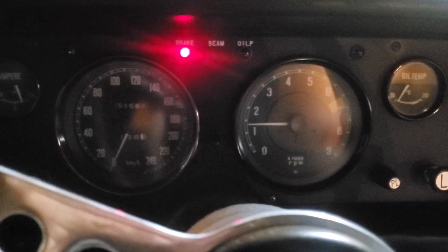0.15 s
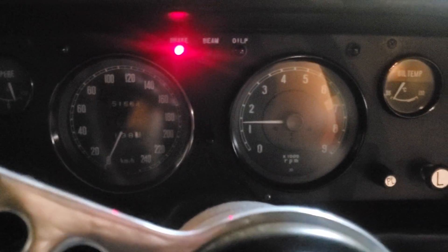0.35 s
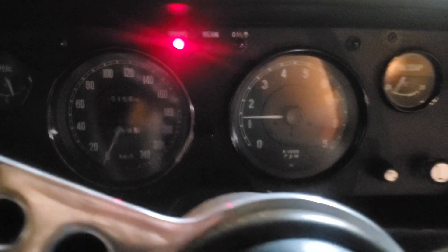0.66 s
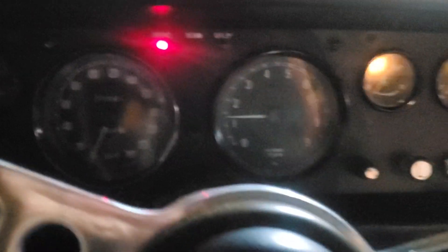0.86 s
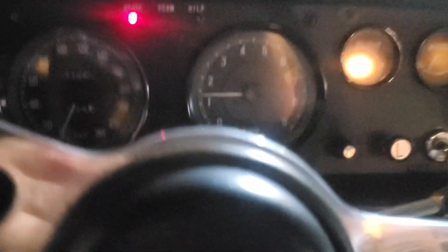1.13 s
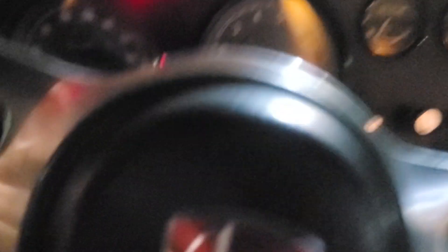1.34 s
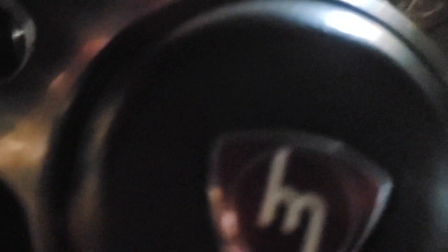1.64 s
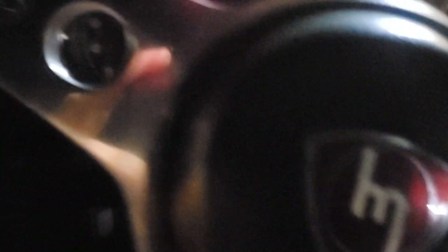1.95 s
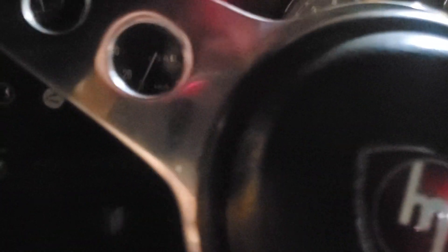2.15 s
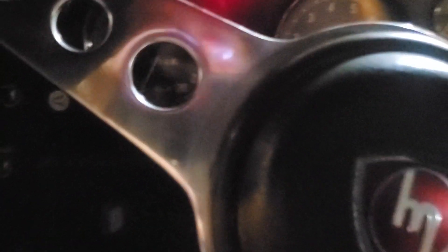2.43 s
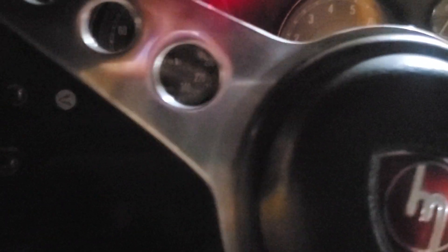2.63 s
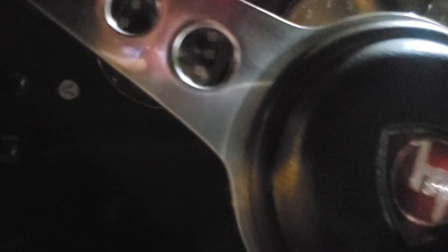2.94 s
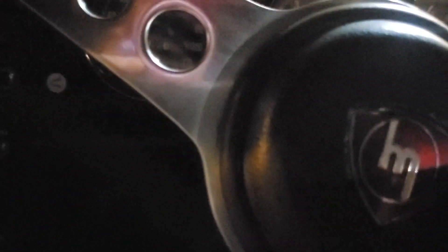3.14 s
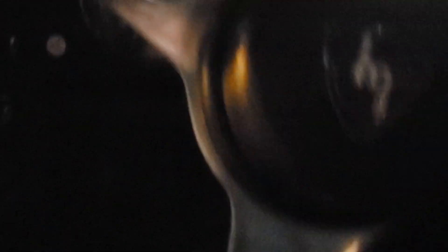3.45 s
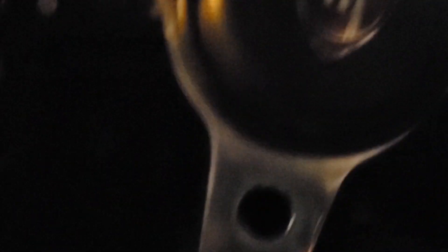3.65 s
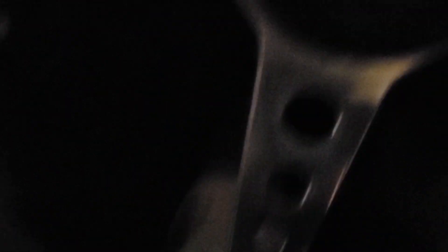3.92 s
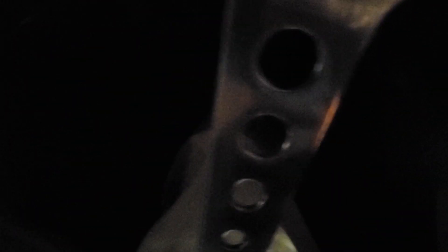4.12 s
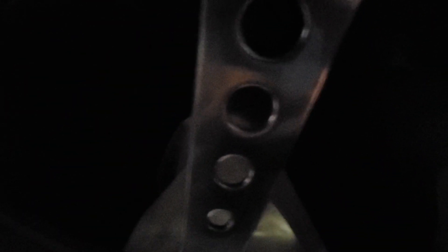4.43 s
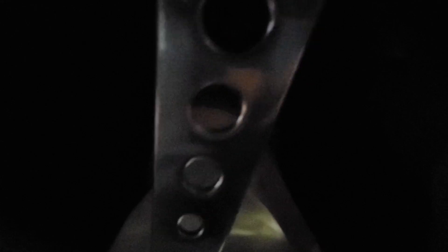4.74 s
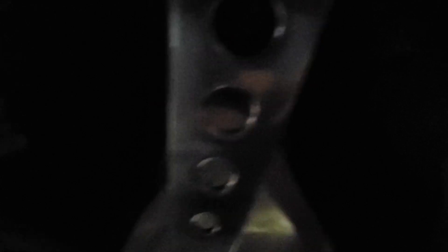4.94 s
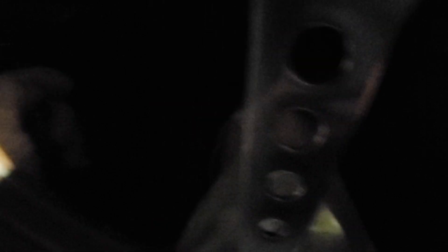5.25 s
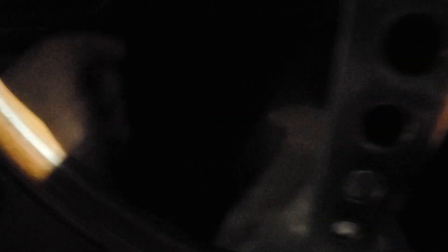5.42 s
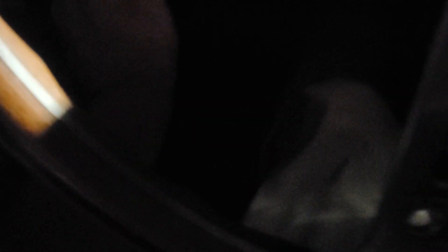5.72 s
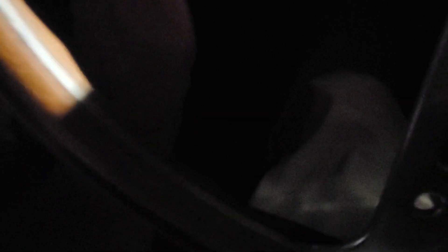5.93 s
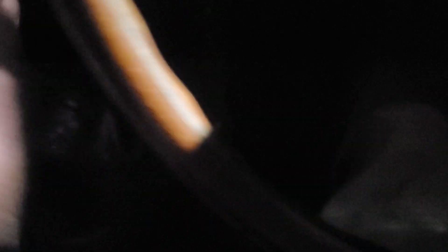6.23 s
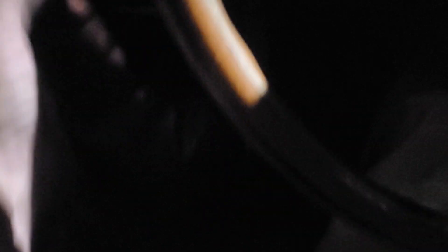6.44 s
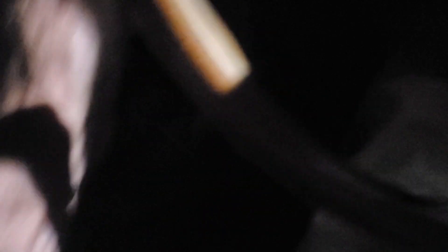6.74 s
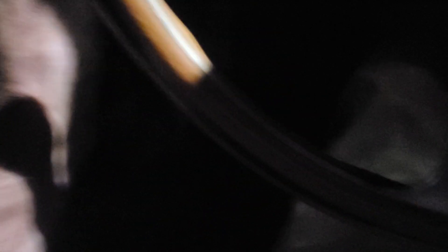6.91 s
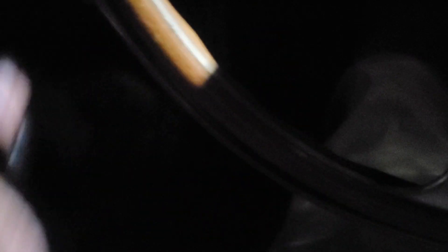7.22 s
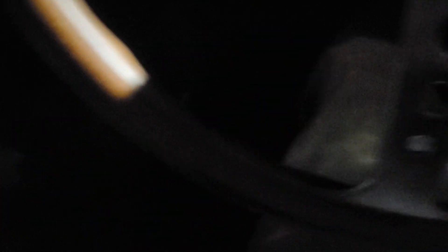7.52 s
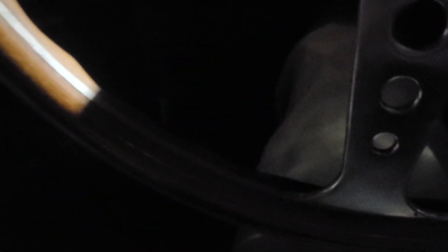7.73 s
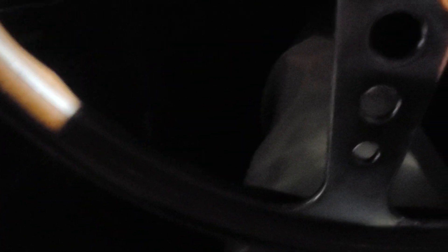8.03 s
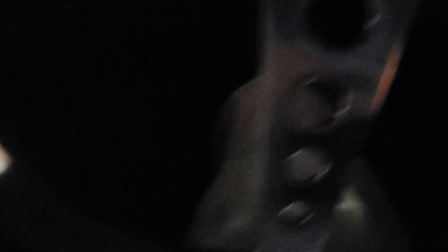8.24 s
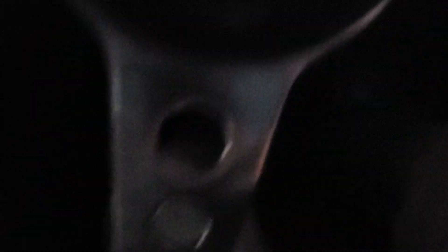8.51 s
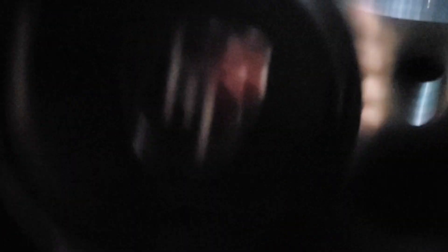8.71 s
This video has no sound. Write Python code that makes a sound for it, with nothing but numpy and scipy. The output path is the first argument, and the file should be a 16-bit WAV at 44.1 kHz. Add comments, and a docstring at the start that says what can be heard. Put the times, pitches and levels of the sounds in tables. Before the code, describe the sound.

A close cabin microphone catches a deep, fluttering engine drone with mechanical wash, faint ticking and quick spurts of hiss. Around three seconds a sharp double crack with a dull dashboard thump makes the recording level drop for about a second. The engine slows to an even, pulsing lumpy idle. Metallic clicks and tiny chirps come from hand controls, then two gentle revs swell and growl at the end.

```python
"""A fast, stumbling idle with hiss in spurts comes first: a two-rotor engine, heard inside an old car.
Firing pulses make its beat and ring the cabin; shaped noise makes its air and mechanical wash.
A knob, made of noise bursts and dashboard tones, snaps home; the automatic gain ducks for about a second.
The engine settles to a slow lope, about four surges a second. Rattling, ringing clicks come from the
controls under a hand, and two small blips of the throttle end it."""
import sys
import numpy as np
from scipy import signal
from scipy.fft import rfft, irfft, next_fast_len
from scipy.io import wavfile
from scipy.ndimage import uniform_filter1d, minimum_filter1d

SR = 44100
rng = np.random.default_rng(int(sys.argv[2]) if len(sys.argv) > 2 else 0)


def digitize_waveform(pressure):
    """Quantize a signal to 16-bit integers and store it at the path in sys.argv[1].

    Rows of a 2-D input are taken as channels; values are limited to [-1, 1].
    """
    field = np.atleast_2d(pressure).T
    bounded = np.clip(field, -1, 1)
    quanta = np.round(bounded * 32767).astype(np.int16)
    wavfile.write(sys.argv[1], SR, quanta)


N = 391156
TIME = np.arange(N) / SR

# engine speed before the flywheel sways it: [t/s, firing rate/Hz]
SPEED = [(0, 54.5), (1.2, 53.6), (2.5, 54.3), (3.05, 53.3), (3.7, 50), (4.4, 42), (7.93, 44.5), (8.07, 53),
         (8.28, 55.5), (8.46, 68), (8.64, 62), (8.8, 46)]
# engine heard through the body, before blips and surges: [t/s, drone level/dB, wash level/dB]
BODY = [(0, -27, -42), (3.5, -29.5, -46), (4.25, -29.5, -42.5), (5.15, -34.5, -40), (6.6, -36.5, -41),
        (7.7, -34, -40), (8.87, -33, -37)]
# the engine stumbles, a run of air puffs and then a surge: [t/s, puff level/dB, surge level/dB]
STUMBLES = [(-0.025, -33.5, 3.5), (0.185, -30.5, 2.5), (0.457, -31.5, 1.5), (0.735, -29.5, 0.5),
            (1.01, -32.5, -1.5), (1.235, -30, 1), (1.515, -30, 2.5), (1.73, -30.5, 1), (2.008, -30.5, 0.5),
            (2.282, -34, 4.5), (2.39, -30, 2), (2.505, -32.5, 5.5), (2.71, -28.5, 2), (2.925, -34, 2.5),
            (3.15, -45, 1), (3.46, -44.5, -0.5), (3.555, -43, 0), (3.77, -37, 1.5), (3.885, -37.5, -2),
            (4.03, -43, 1.5), (4.15, -37.5, 3.5), (4.355, -36, 5), (4.605, -36, 5.5), (4.838, -36, 6.5),
            (5.075, -37.5, 6.5), (5.35, -39, 7), (5.63, -40.5, 6.5), (5.757, -40, 2), (5.87, -39, 5.5),
            (6.135, -37.5, 6.5), (6.394, -42.5, 7.5), (6.643, -38, 5), (6.835, -37.5, 6.5),
            (7.06, -37.5, 7), (7.335, -37.5, 6.5), (7.605, -37.5, 6), (7.868, -38, 9.5), (8.2, -35.5, 0.5),
            (8.72, -41, 0)]
# the puffs of every stumble, each with a sag of the exhaust beat:
# [fast idle: delay t/s, level/dB, sag level/dB; then the same three in the lope]
PUFFS = [(-0.028, -9, 1.3, -0.032, -22.5, 1.5), (0, -2, 2.5, -0.00067, -1, 11),
         (0.056, -3.5, 19, 0.0545, -3, 4.1), (0.135, -9.5, 2, 0.097, -3, 0.62),
         (0.193, -11, 1, 0.1636, -13, 6.6)]
# the quick stumbling gives way to a slow lope: [t/s, share of lope]
LOPE = [(4.2, 0), (4.55, 1)]
# outright misfires leave a hole in the beat: [t/s, depth level/dB]
MISFIRES = [(0.56, 9.5), (0.835, 4), (1.08, 8), (2.115, 7), (2.325, 3), (3.09, 11.5), (3.8, 10),
            (4.375, 12), (8.15, 7), (8.46, 12), (8.74, 8)]
# blips of the throttle: [t/s, length t/s, air rush level/dB, drone rise level/dB, growl level/dB]
BLIPS = [(7.864, 0.21, -35, 4, -26), (8.35, 0.14, -33, 4.5, -22)]
# cabin and pipe resonances: [f/Hz, width f/Hz, fast idle level/dB, slow idle level/dB]
CABIN = [(60.4, 12, 0.5, 3.5), (108, 5.9, 4.5, -6.5), (136.8, 16.3, -12, 0), (182.4, 18.2, -1.5, -4.5),
         (234.5, 8.8, -2, -13.5)]
# tones locked to the shaft: [multiple of the firing rate]
ORDER_MULTIPLES = [2.75, 3]
# their levels against the drone: [fast idle level/dB, slow idle level/dB]
ORDER_LEVELS = [(-8, -14), (-28, -5)]
# overtones of the firing rate under throttle, from the second up: [level/dB]
GROWL_LEVELS = [-4, 0, -11, -16]
# the snapping knob and its rebounds: [t/s, level/dB, decay t/s]
SNAP = [(3.1498, 2.5, 0.014), (3.166, 2.5, 0.004), (3.179, -9, 0.007), (3.297, -28, 0.015)]
# colour of the snap: [f/Hz, level/dB]
SNAP_COLOUR = [(150, 12), (380, -11), (490, 17.5), (650, -17), (1300, -11), (2900, 3.5), (5500, -1),
               (12500, -9), (16000, -7.5)]
# tones of the dashboard after a knock: [f/Hz, level/dB, time to fall 60 dB t/s]
DASH = [(50.16, 2, 0.75), (93, 4.5, 0.41), (134.3, -5.5, 0.53), (168.9, -4, 0.53), (194.3, -6, 0.23),
        (323, -18, 0.21)]
# clicks of the controls; ring is relative to the click, thud is not:
# [t/s, level/dB, left-right level/dB, rattle decay t/s, ring level/dB, thud level/dB]
CLICKS = [(3.845, -27, -13, 0.011, -4, -61), (4.0087, -24, -10, 0.0015, -22, -60),
          (4.04, -29, -16, 0.06, -32, -36), (4.0605, -11, -17, 0.00064, -10, -33),
          (4.08, -23, 4, 0.002, -20, -54), (5.235, -28.5, -3, 0.022, -21, -56),
          (5.3237, -28.5, -8, 0.025, 16.5, -58), (5.654, -28.5, -11, 0.01, -6, -53),
          (5.669, -20, 0, 0.014, 0, -31.5), (5.69, -24.5, -6, .012, -2, -24),
          (5.840, -23.5, -20, 0.0016, -18, -60), (6.769, -24.5, 0, 0.02, 0, -41),
          (7.345, -29.5, -4, 0.052, -11, -33), (8.663, -10.5, -20, 0.0011, -31, -34),
          (8.67, -24, -4, 0.00098, -14, -53)]
# colour of the rattles: [f/Hz, level/dB]
CLICK_COLOUR = [(200, 29), (700, 18.5), (1700, 18), (4500, 13), (8000, 8), (16000, -4)]
# tones of the clicking linkage: [f/Hz, level/dB, time to fall 60 dB t/s]
LINKAGE = [(1777, -4.5, 0.027), (2050, -22, 0.12), (2700, -21.5, 0.047), (3180, -11, 0.061),
           (4470, -14, 0.036), (5800, -24, 0.024)]
# brief chirps where parts of the controls rub: [t/s, level/dB, f/Hz, decay t/s]
CHIRPS = [(4.0822, -12.5, 3550, 0.0012), (5.655, -28, 3400, 0.01), (5.668, -16.5, 2960, 0.0048),
          (5.67, -12, 1650, 0.0023), (5.690, -25.5, 2930, 0.011), (6.77, -27, 2900, 0.006)]
# colour of the mechanical wash: [f/Hz, fast idle level/dB, slow idle level/dB]
WASH = [(240, -24.5, -7), (356, -8, -16), (445, -10, -10), (620, -18, -20), (1110, -16.5, -19),
        (2120, -25.5, -26.5), (3540, -22.5, -30.5), (6900, -59, -60)]
# panels singing along: [f/Hz, width f/Hz, fast idle level/dB, slow idle level/dB]
PANELS = [(146.7, 10.3, 0.5, 0.5), (199.6, 5.8, 0.5, -4), (237.9, 6.7, -17, -7), (327.4, 10.3, -2.5, -3.5),
          (686, 87, -5, -11), (971, 13, -19, -13.5), (1998, 14, -15.5, -16)]
# what the ticking part rings with: [f/Hz, width f/Hz, level/dB]
TICK_MODES = [(850, 150, -4), (1470, 140, -1), (1650, 140, 0), (1910, 140, 0)]
# colour of the rushing air: [f/Hz, fast idle level/dB, slow idle level/dB]
AIR = [(1530, -1, -5), (2680, -3.5, 4.5), (3580, 0.5, 0.5), (6860, 2.5, 4), (7550, 2.5, 1), (9280, -1.5, 7),
       (10030, 3.5, -1.5), (11100, -3.5, 1), (15800, -2.5, -3)]
# wheezes at fast idle: [t/s, length t/s, level/dB, start f/Hz, end f/Hz]
WHEEZES = [(.5, .44, -50, 1880, 1880), (2.0, .45, -49, 1950, 1640)]
# a thin whine that comes and goes: [t/s, level/dB]
WHINE = [(0, -58), (.3, -51), (.7, -59), (3.7, -63), (3.88, -52), (4.7, -51), (5.2, -63)]
# the two tones of the whine, before they waver: [f/Hz]
WHINE_TONES = [3063, 3145]
# left-right balance of the engine's noise: [f/Hz, fast idle level/dB, slow idle level/dB]
LEAN = [(600, 1, -1.5), (1500, -1, -6.5), (2740, -1, -8), (6660, 0, 3), (8250, -6, -7.5), (14000, 2, 5)]

# the surge peaks this long after a stumble
SURGE_FAST_S, SURGE_SLOW_S, SURGE_WIDTH_S = 0.165, 0.105, 0.08
# the beat sags this long after each puff, at fast idle and in the lope
SAG_FAST_S, SAG_SLOW_S, SAG_WIDTH_S = 0.035, 0.021, 0.012
MISFIRE_WIDTH_S = 0.025
# each puff swells, holds and dies; a little air leaks between the puffs
PUFF_ATTACK_S, PUFF_HOLD_S, PUFF_RELEASE_S, AIR_FLOOR_DB = 0.0048, 0.02, 0.032, -51
# exhaust beat between surges; it weakens once the firing rate climbs past the cabin's boom
BEAT_FAST_DB, BEAT_SLOW_DB, BOOM_TOP_HZ, OFF_BOOM_DB_PER_HZ = -16, -18, 58.4, 0.6
# the flywheel follows the surges with this lag; share of speed gained per dB of surge
FLYWHEEL_S, SPIN_FAST, SPIN_SLOW = 0.1, 0.01, 0.028
# the wash takes this share of the drone's rise in a blip
BLIP_ATTACK_S, BLIP_RELEASE_S, BLIP_WASH_SHARE = 0.038, 0.071, 0.55
CHATTER_DB, CHATTER_RATE_HZ = 3.5, 90
RATTLE_SWELL = 0.07  # share of a rattle's decay
CHIRP_WIDTH_HZ, CHIRP_ATTACK_S, CHIRP_PAN_DB = 600, 0.00034, -9
TICK_DB = -6.5  # against the wash
WHEEZE_WIDTH_HZ = 110
CUTOFF_HZ = 16000


def engine(drone_follows=0.051):
    """Exhaust, drone, machinery and air; surges spin the flywheel up and stumbles let it sag."""
    firing_hz, = in_time(SPEED)
    drone_db, wash_db = in_time(BODY)
    slow, = in_time([(3.6, 0), (4.5, 1)])  # 0 at fast idle, 1 at slow idle
    puffs, surge_db = stumbling()
    rush, blip_db, growl_gain = throttle()

    beat_db = between(BEAT_FAST_DB, BEAT_SLOW_DB, slow) + surge_db - bumps(MISFIRES, MISFIRE_WIDTH_S)
    swing_db = beat_db - uniform_filter1d(beat_db, SR // 2)
    surge_swing_db = surge_db - uniform_filter1d(surge_db, SR // 2)
    keep = np.exp(-1 / (FLYWHEEL_S * SR))
    spin_db = signal.lfilter([1 - keep], [1, -keep], surge_swing_db)
    swayed_hz = firing_hz * (1 + between(SPIN_FAST, SPIN_SLOW, slow) * spin_db)
    firings = np.cumsum(swayed_hz) / SR  # running count of firings

    off_boom_db = OFF_BOOM_DB_PER_HZ * np.maximum(firing_hz - BOOM_TOP_HZ, 0)
    beat = from_db(beat_db - off_boom_db) * exhaust(firings, slow)
    body = from_db(drone_db + blip_db + drone_follows * swing_db) * drone(firings, slow)
    tones = from_db(drone_db) * orders(firings, slow) + growl_gain * growl(firings)
    machinery = from_db(wash_db + BLIP_WASH_SHARE * blip_db) * wash(firings, slow)
    ticks = from_db(wash_db + TICK_DB) * (1 - slow) * ticking(firings)
    air_gain = np.sqrt(puffs ** 2 + rush ** 2 + from_db(AIR_FLOOR_DB) ** 2)
    air = air_gain * hiss(firings, slow)
    return beat + body + tones + lean(machinery + ticks + wheezes() + accessories(slow) + air, slow)


def exhaust(firings, slow, boom_fast_db=-13, boom_slow_db=-23, wander_turns=0.37):
    """One pressure wave per firing; a cabin boom at 3/4 of that rate weakens about every fourth."""
    second_gain = from_db(-18) * (1 - 0.87 * slow)
    second = second_gain * np.sin(2 * np.pi * 2 * firings)
    uneven = 0.21 * (1 - 0.19 * slow) * drift(18.6)
    beat = (np.sin(2 * np.pi * firings) + second) * (1 + uneven)
    boom_turns = firings * 3 / 4 + wander_turns * drift(1.02)
    boom = from_db(between(boom_fast_db, boom_slow_db, slow)) * np.sin(2 * np.pi * boom_turns)
    side = from_db(-21) * beat * [[1], [-1]] * (1 - slow)
    return np.sqrt(2) * (beat + side + boom)


def drone(firings, slow, uneven_db=6.0, jitter_s=0.0004, rough_db=-13, side_db=-12, path_s=0.007):
    """Uneven firing pulses and turbulence reach each next resonance by a longer path."""
    at = np.flatnonzero(np.diff(np.floor(firings)))
    late, strength = rng.standard_normal((N // 100, 2))[:len(at)].T
    places = np.clip(at + (jitter_s * SR * late).astype(int), 0, N - 1)
    pulses = np.zeros(N)
    pulses[places] = from_db(uneven_db * np.tanh(strength))
    turbulence = from_db(rough_db) * rng.standard_normal(N)
    side = from_db(side_db) * rng.standard_normal(N) * [[1], [-1]]
    drive = rms_one(pulses) + turbulence + side
    rung = 0
    for k, (hz, width, fast_db, slow_db) in enumerate(CABIN):
        delayed = np.roll(drive, int(k * path_s * SR), axis=1)
        rung = rung + from_db(between(fast_db, slow_db, slow)) * resonate(delayed, hz, width)
    return rms_one(signal.sosfilt(signal.butter(2, [60, 320], "band", fs=SR, output="sos"), rung))


def orders(firings, slow, waver_db=7.5, wander_turns=0.064):
    """Clean tones locked to the shaft, each wavering in level and phase."""
    out = 0
    for multiple, (fast_db, slow_db) in zip(ORDER_MULTIPLES, ORDER_LEVELS):
        level_db = between(fast_db, slow_db, slow) + waver_db * np.tanh(drift(2.8))
        turns = multiple * firings + wander_turns * drift(18.0)
        out = out + from_db(level_db) * np.sin(2 * np.pi * turns)
    return out


def growl(firings):
    """Under throttle a growl of overtones, each wavering in level, stands out and follows the firing rate."""
    out = 0
    for k, db in enumerate(GROWL_LEVELS, 2):
        out = out + from_db(db + 2.5 * drift(14)) * np.sin(2 * np.pi * k * firings)
    return rms_one(out)


def throttle():
    """Each blip opens, holds and shuts: gain of its air, dB added to the drone, gain of its growl."""
    rush, rise_db, growl_gain = 0, 0, 0
    for s, length, air_db, drone_db, growl_db in BLIPS:
        rise = 1 - np.exp(-np.maximum(TIME - s, 0) / BLIP_ATTACK_S)
        fall = np.exp(-np.maximum(TIME - s - length, 0) / BLIP_RELEASE_S)
        opening = rise * fall
        rush = rush + from_db(air_db) * opening
        rise_db = rise_db + drone_db * opening
        growl_gain = growl_gain + from_db(growl_db) * opening ** 2
    return rush, rise_db, growl_gain


def stumbling():
    """Gain of the air puffs, and dB of the beat's surges and sags; a new stumble cuts off the last."""
    power, sags, surges = np.zeros(N), [], []
    lopes = np.interp([s for s, _, _ in STUMBLES], *np.transpose(LOPE))
    ends = [s + PUFFS[0][0] for s, _, _ in STUMBLES[1:]] + [N / SR]
    for (start, puff_db, surge_db), lope, end in zip(STUMBLES, lopes, ends):
        surges.append((start + between(SURGE_FAST_S, SURGE_SLOW_S, lope), surge_db))
        for fast_puff, slow_puff in np.reshape(PUFFS, (-1, 2, 3)):
            delay, db, sag_db = between(fast_puff, slow_puff, lope)
            s = start + delay
            if s >= end:
                continue
            span, _ = after(max(s - PUFF_ATTACK_S, 0))
            since = TIME[span] - s - PUFF_ATTACK_S
            swell = (np.minimum(since, 0) / PUFF_ATTACK_S) ** 2
            fade = (np.maximum(since - PUFF_HOLD_S, 0) / PUFF_RELEASE_S) ** 2
            power[span] += (from_db(puff_db + db) * np.exp(-swell - fade)) ** 2
            sags.append((s + between(SAG_FAST_S, SAG_SLOW_S, lope), sag_db))
    return np.sqrt(power), bumps(surges, SURGE_WIDTH_S) - bumps(sags, SAG_WIDTH_S)


def knob(boom_db=0.0, boom_delay=0.0195, tail_db=-7, tail_decay=0.063, pan_db=-3.0):
    """A hard snap with its rebounds; the dashboard booms and its loose parts chatter briefly."""
    out, crack = np.zeros((2, N)), noise(SNAP_COLOUR)
    for s, db, decay in SNAP:
        span, age = after(s)
        out[:, span] += from_db(db) * spread(pan_db) * crack[:, span] * np.exp(-age / decay)
    span, age = after(SNAP[0][0])
    parts = noise([(110, 17), (230, 15.5), (500, 11.0), (3000, -5.5), (16000, -22)])
    chatter = rms_one(from_db(CHATTER_DB * np.tanh(drift(CHATTER_RATE_HZ)))) * parts
    out[:, span] += from_db(tail_db) * chatter[:, span] * np.exp(-age / tail_decay)
    span, age = after(SNAP[0][0] + boom_delay)
    out[:, span] += from_db(boom_db) * struck(DASH, age) * (1 - np.exp(-age / 0.0079))
    return out


def controls():
    """Each click is a short rattle, a ring of the linkage and a thud in the dashboard."""
    out, rattle = np.zeros((2, N)), noise(CLICK_COLOUR)
    for s, db, pan_db, decay, ring_db, thud_db in CLICKS:
        span, age = after(s)
        shape = (1 - np.exp(-age / (RATTLE_SWELL * decay))) * np.exp(-age / decay)
        click = rattle[:, span] * shape + from_db(ring_db) * struck(LINKAGE, age)
        out[:, span] += from_db(db) * spread(pan_db) * click + from_db(thud_db) * struck(DASH, age)
    return out


def chirps():
    """A moment of friction excites one resonance of the rubbing part."""
    out = np.zeros((2, N))
    for s, db, hz, decay in CHIRPS:
        span, age = after(s)
        once = resonate(rng.standard_normal((2, SR)), hz, CHIRP_WIDTH_HZ)
        rub = rms_one(resonate(once, hz, CHIRP_WIDTH_HZ))[:, :len(age)]
        shape = (1 - np.exp(-age / CHIRP_ATTACK_S)) * np.exp(-age / decay)
        out[:, span] += from_db(db) * spread(CHIRP_PAN_DB) * rub * shape
    return out


def wash(firings, slow, throb_db=-1.5, panel_side=0.53):
    """Mechanical noise throbs once per firing, and a few panels sing along with it."""
    drive = rng.standard_normal(N) + panel_side * rng.standard_normal((2, N))
    song = 0
    for hz, width, fast_db, slow_db in PANELS:
        panel = rms_one(resonate(resonate(drive, hz, 2 * width), hz, 2 * width))
        song = song + from_db(between(fast_db, slow_db, slow)) * panel
    return idle_noise(WASH, slow) * from_db(throb_db * np.sin(2 * np.pi * firings)) + song


def ticking(firings, uneven_db=1.2):
    """Something on the engine ticks twice for every three firings and rings the same few modes."""
    at = np.flatnonzero(np.diff(np.floor(firings * 2 / 3)))
    chance = rng.standard_normal((N // 500, len(TICK_MODES), 2))[:len(at)]
    out = 0
    for k, (hz, width, db) in enumerate(TICK_MODES):
        strokes = np.zeros((2, N))
        right_sign = (-1) ** (k // 3)  # the fourth mode is opposite in the two channels
        strokes[:, at] = from_db(db + uneven_db * chance[:, k].T) * [[1], [right_sign]]
        out = out + resonate(strokes, hz, width)
    return rms_one(out)


def hiss(firings, slow, flutter_db=0.8, patchy_db=1.3):
    """Rushing air flutters with each turn of the shaft, which is two firings."""
    flutter = flutter_db * np.sin(np.pi * firings)
    return idle_noise(AIR, slow) * from_db(flutter + patchy_db * drift(29))


def wheezes():
    """A narrow band of noise swells and fades; its pitch may slide."""
    out = np.zeros((2, N))
    for s, length, db, from_hz, to_hz in WHEEZES:
        span, age = after(s)
        along = np.minimum(age / length, 1)
        phase = 2 * np.pi * np.cumsum(between(from_hz, to_hz, along)) / SR
        swell = np.sqrt(np.abs(np.sin(np.pi * along)))
        for side in out:
            cosine_part = drift(WHEEZE_WIDTH_HZ)[span] * np.cos(phase)
            sine_part = drift(WHEEZE_WIDTH_HZ)[span] * np.sin(phase)
            side[span] += from_db(db) * swell * (cosine_part + sine_part)
    return out


def accessories(slow, hum_hz=638, hum_db=-47, low_hz=203, low_db=19):
    """A wavering hum at fast idle, and a thin two-tone whine that comes and goes with a low hum."""
    whine_db, = in_time(WHINE)
    hum_gain = from_db(hum_db + 1.5 * drift(7)) * (1 - slow)
    hum = hum_gain * np.sin(2 * np.pi * np.cumsum(hum_hz + 8 * drift(14)) / SR)
    whine = 0
    for hz in WHINE_TONES:
        tone = np.sin(2 * np.pi * np.cumsum(hz + 16 * drift(19.3)) / SR)
        whine = whine + from_db(4.9 * np.tanh(drift(2.3))) * tone
    low = from_db(low_db) * np.sin(2 * np.pi * np.cumsum(low_hz + drift(1.48)) / SR)
    return hum + from_db(whine_db) * (rms_one(whine) + low)


def lean(x, slow):
    """Each band reaches the two microphone ports at different levels."""
    size = next_fast_len(N)
    hz, spectrum = np.fft.rfftfreq(size, 1 / SR), rfft(x, size)
    points, *columns = np.transpose(LEAN)
    leaned = []
    for db in columns:
        gain = from_db(np.interp(hz, points, db) * [[1], [-1]] / 2)
        gain = gain / np.sqrt(np.mean(gain ** 2, axis=0))
        leaned.append(irfft(spectrum * gain, size)[:, :N])
    return between(*leaned, slow)


def idle_noise(colours, slow):
    """Noise whose colour passes from that of the fast idle to that of the slow one."""
    fast_noise = noise([(hz, db) for hz, db, _ in colours])
    slow_noise = noise([(hz, db) for hz, _, db in colours])
    return np.sqrt(1 - slow) * fast_noise + np.sqrt(slow) * slow_noise


def noise(spectrum, merge_hz=650, ripple_hz=45):
    """Coloured stereo noise, alike in both ears below merge_hz; cabin reflections ripple its spectrum."""
    size = next_fast_len(N)
    hz = np.maximum(np.fft.rfftfreq(size, 1 / SR), 1)
    points = np.array(spectrum)
    colour_db = np.interp(np.log(hz), np.log(points[:, 0]), points[:, 1])
    low_fade = np.minimum(hz / points[0, 0], 1) ** 2
    chance_db = 2.2 * rng.standard_normal(SR // 20)
    ripple_db = np.interp(hz / ripple_hz, np.arange(len(chance_db)), chance_db) * hz / (hz + merge_hz)
    gain = from_db(colour_db + ripple_db) * low_fade
    alike = 1 / (1 + (hz / merge_hz) ** 4)
    mid, side = rfft(rng.standard_normal((2, size)))
    stereo = np.sqrt(1 + alike) * mid + np.sqrt(1 - alike) * side * [[1], [-1]]
    return rms_one(irfft(gain * stereo, size)[:, :N])


def resonate(x, hz, width):
    """A resonance with gain 1 on top."""
    r = np.exp(-np.pi * width / SR)
    feedback = [1, -2 * r * np.cos(2 * np.pi * hz / SR), r * r]
    return signal.lfilter(np.array([1, 0, -1]) * (1 - r * r) / 2, feedback, x + 1e-18)


def struck(modes, age):
    """Decaying tones of a struck body at a given time since the blow, with alternating signs."""
    out = 0
    for k, (hz, db, t60) in enumerate(modes):
        out = out + (-1) ** k * from_db(db - 60 * age / t60) * np.sin(2 * np.pi * hz * age)
    return out


def drift(rate_hz):
    """Slow chance with spread 1, made at every 40th sample and joined by lines."""
    r = np.exp(-80 * np.pi * rate_hz / SR)
    chance = rng.standard_normal(N // 40 + 2002)
    slow = signal.lfilter([1], [1, -2 * r, r * r], chance)[2000:]  # drop the run-in
    return np.interp(np.arange(N) / 40, np.arange(len(slow)), rms_one(slow))


def bumps(rows, width_s):
    """A bell-shaped bump for each row of (t/s, height)."""
    coarse = TIME[::40]
    total = sum(height * np.exp(-((coarse - s) / width_s) ** 2) for s, height in rows)
    return np.interp(TIME, coarse, total)


def between(start, end, share):
    """A value passing from start (such as fast idle) to end (slow idle)."""
    return start + share * (end - start)


def in_time(rows):
    """Each column of a curve at every sample."""
    s, *columns = np.transpose(rows)
    return [np.interp(TIME, s, c) for c in columns]


def after(s):
    """Up to a second following an event: its samples and their ages."""
    start = round(s * SR)
    stop = min(start + SR, N)
    return slice(start, stop), np.arange(stop - start) / SR


def spread(db):
    """Left and right gains of equal total power for a level difference."""
    return rms_one(from_db(np.array([[db], [-db]]) / 2))


def from_db(db):
    """Decibels to gain."""
    return 10 ** (np.asarray(db) / 20)


def rms_one(x):
    """Scale to unit power."""
    return x / np.sqrt(np.mean(x ** 2) + 1e-20)


def scene():
    """Engine, knob and controls, heard from the driver's seat."""
    return engine() + knob() + controls() + chirps()


def gain_control(x, threshold_db=-21, deepest_db=12.0, hold_s=1.197, release_db_per_s=31):
    """A loud sound above the bass pulls the gain down at once; it is held, then comes back."""
    sensed = signal.sosfilt(signal.butter(2, 400, "high", fs=SR, output="sos"), x)
    power = uniform_filter1d(np.mean(sensed ** 2, axis=0), SR // 100, origin=SR // 250)
    over_db = np.clip(10 * np.log10(np.maximum(power, 1e-12)) - threshold_db, 0, deepest_db)
    size = int(hold_s * SR) // 2 * 2 + 1
    held_db = -minimum_filter1d(-over_db, size, origin=size // 2, mode="constant")
    release_db = release_db_per_s * TIME
    cut_db = np.maximum.accumulate(held_db + release_db) - release_db
    return x * from_db(-cut_db)


def record(dry):
    """Low cut of the microphone, gain control, rounded peaks and a steep top cut."""
    heard = signal.sosfilt(signal.butter(6, 29, "high", fs=SR, output="sos"), dry)
    limited = 0.85 * np.tanh(gain_control(heard) / 0.85)
    return signal.sosfilt(signal.ellip(12, 0.1, 80, CUTOFF_HZ, fs=SR, output="sos"), limited)


dry = scene()
out = record(dry)
digitize_waveform(out)
```